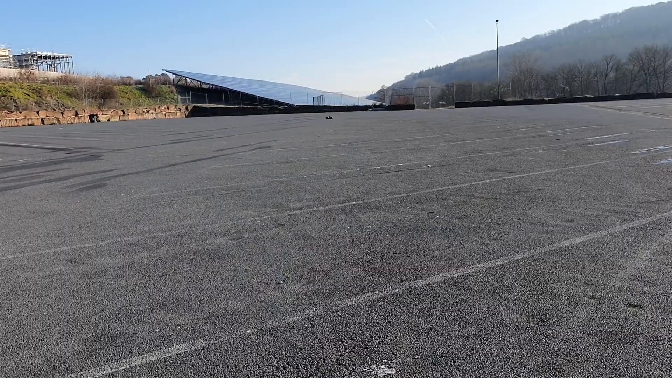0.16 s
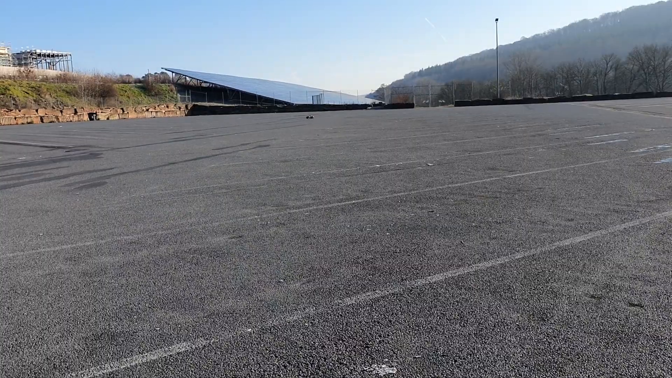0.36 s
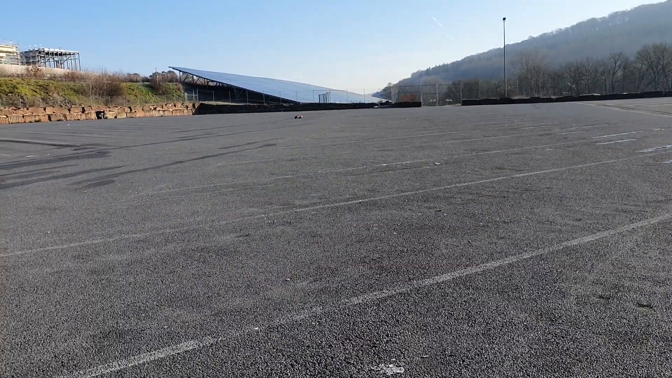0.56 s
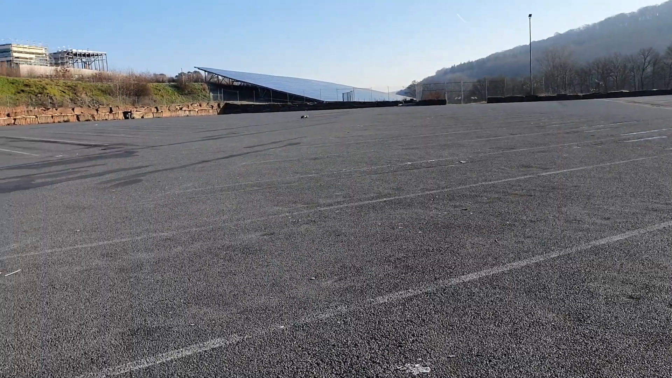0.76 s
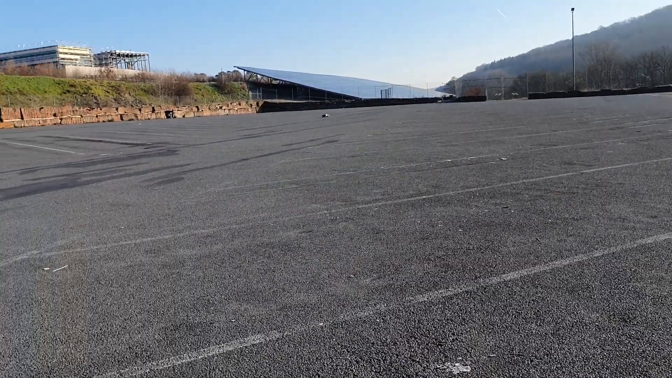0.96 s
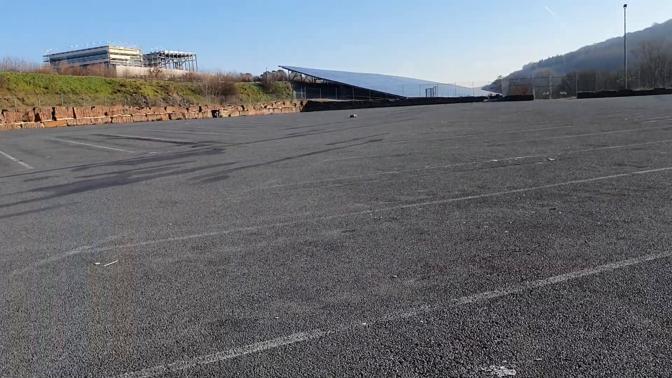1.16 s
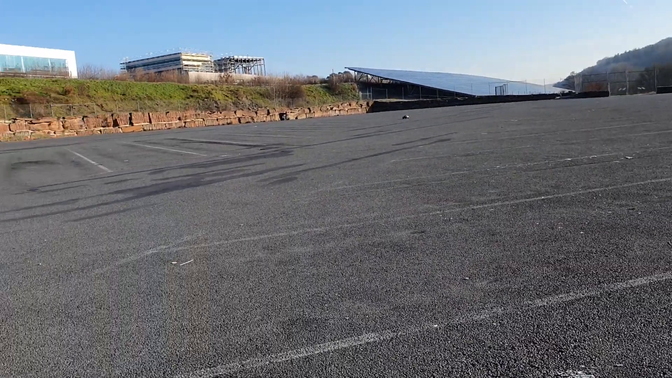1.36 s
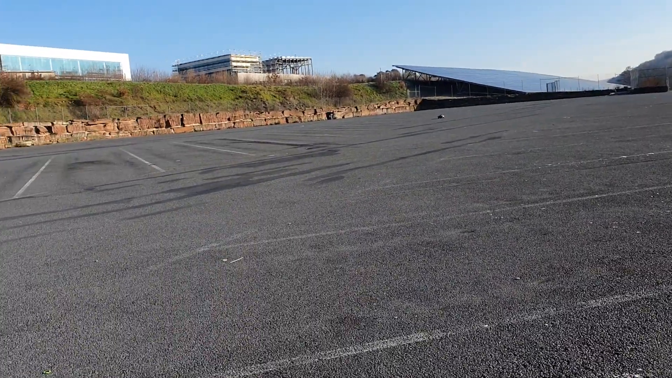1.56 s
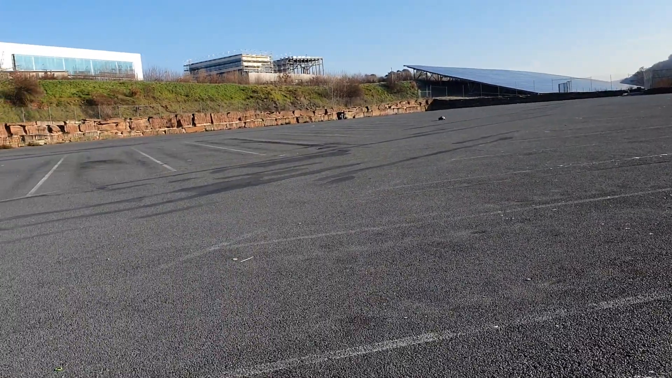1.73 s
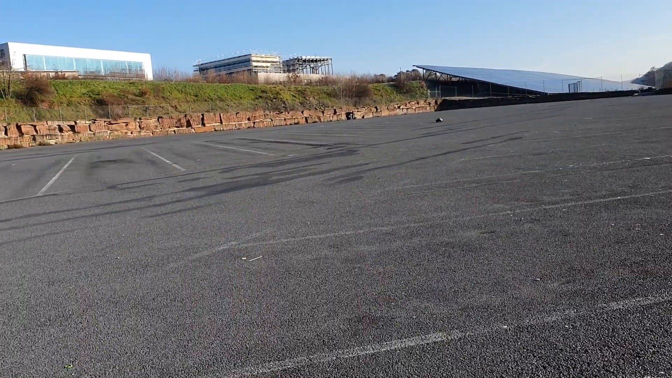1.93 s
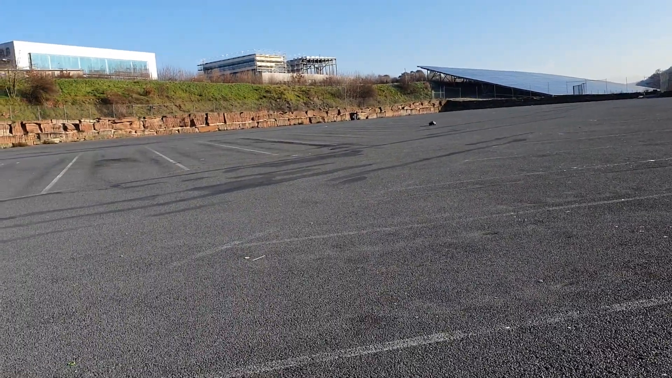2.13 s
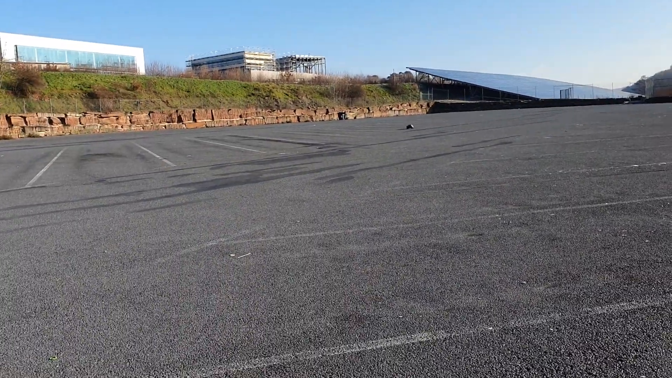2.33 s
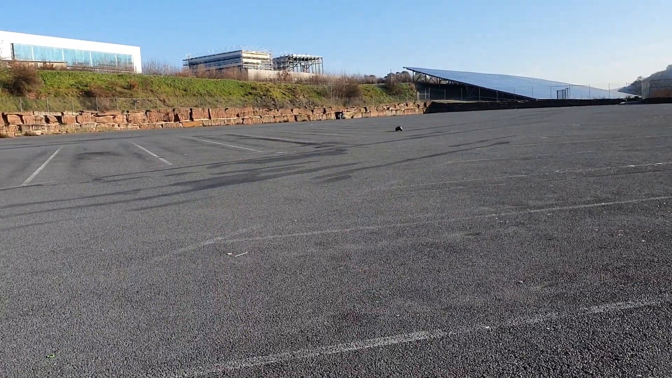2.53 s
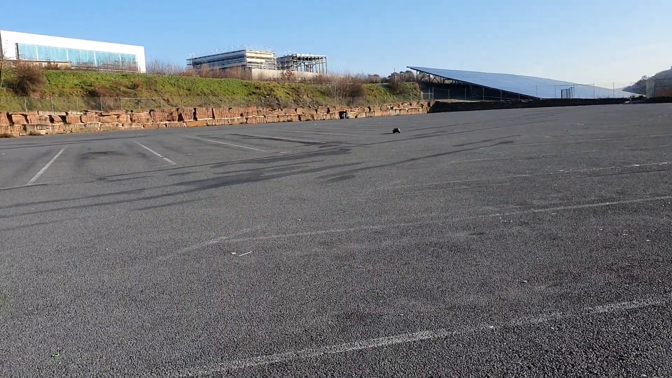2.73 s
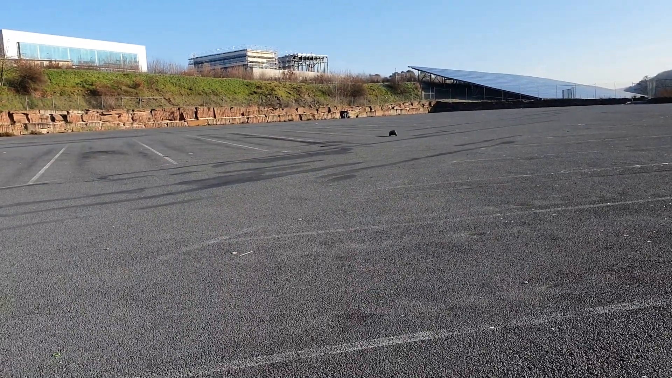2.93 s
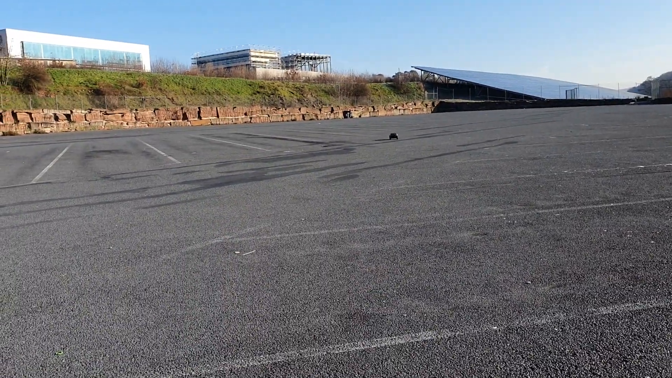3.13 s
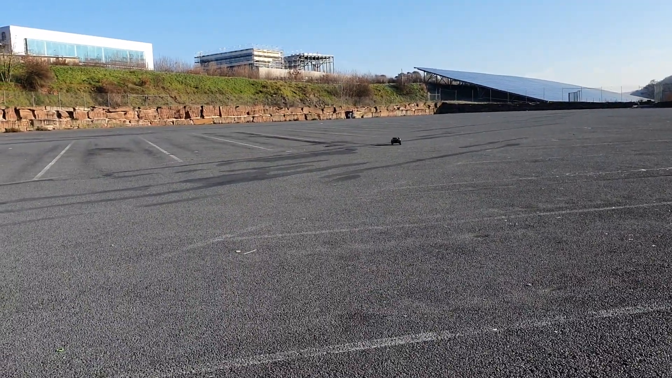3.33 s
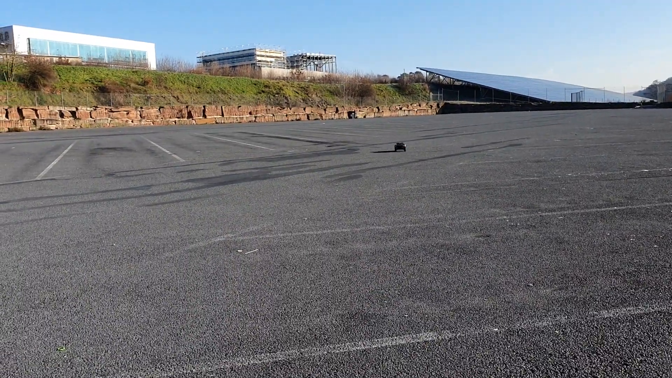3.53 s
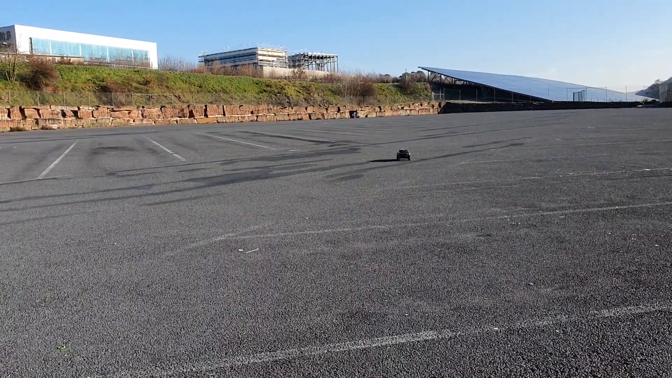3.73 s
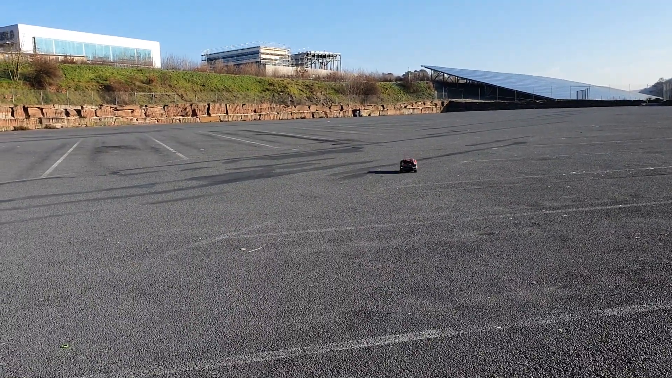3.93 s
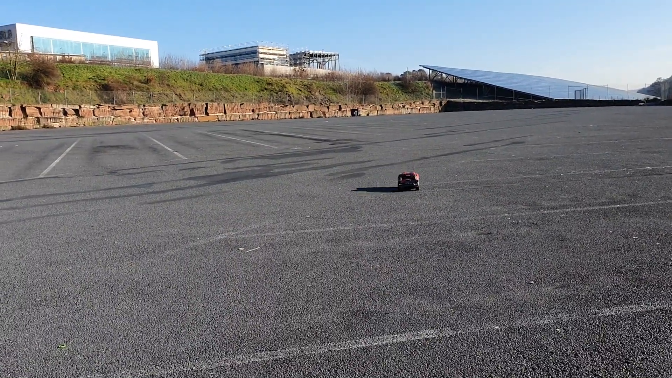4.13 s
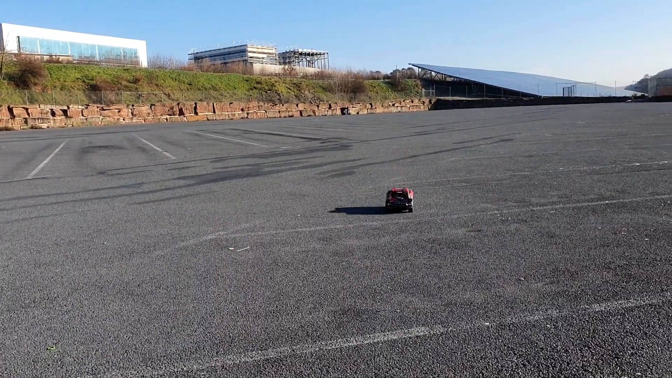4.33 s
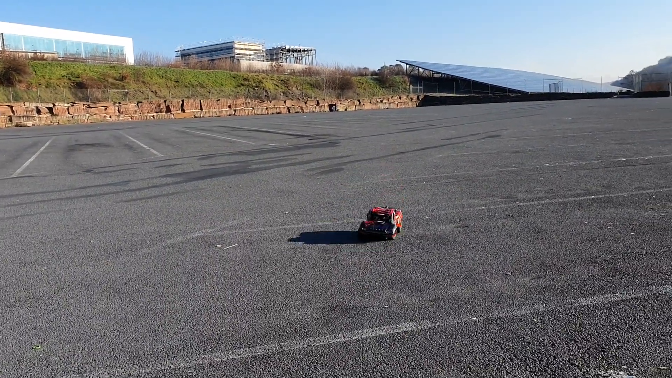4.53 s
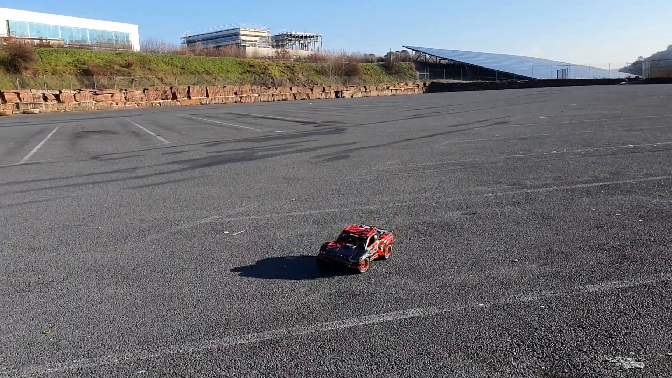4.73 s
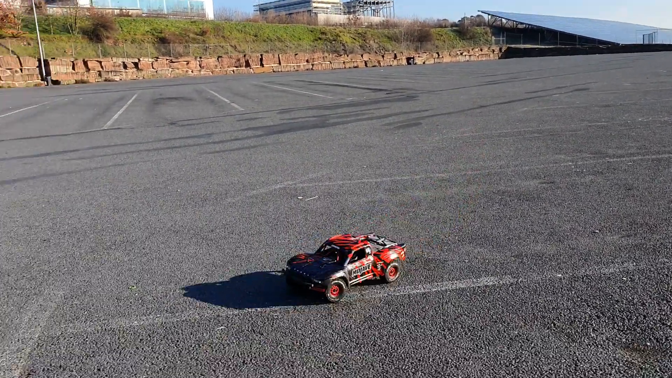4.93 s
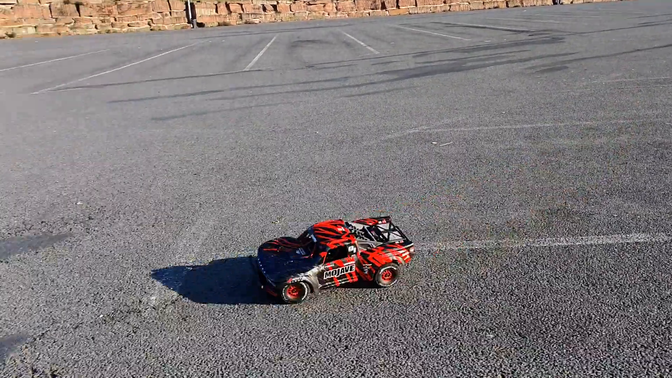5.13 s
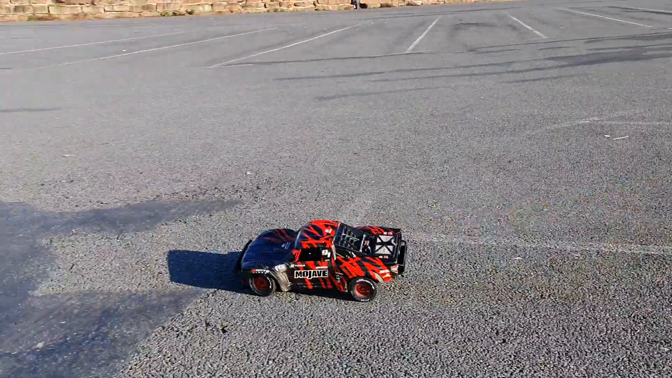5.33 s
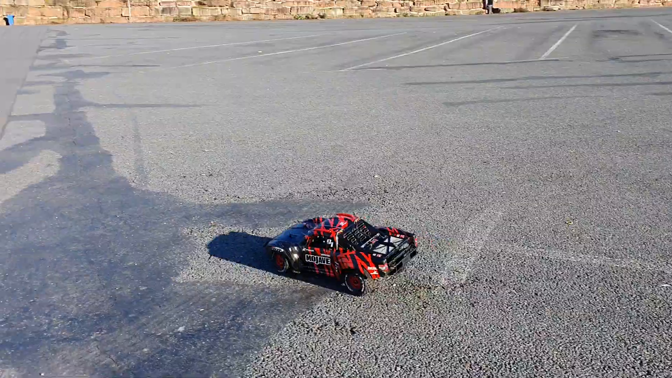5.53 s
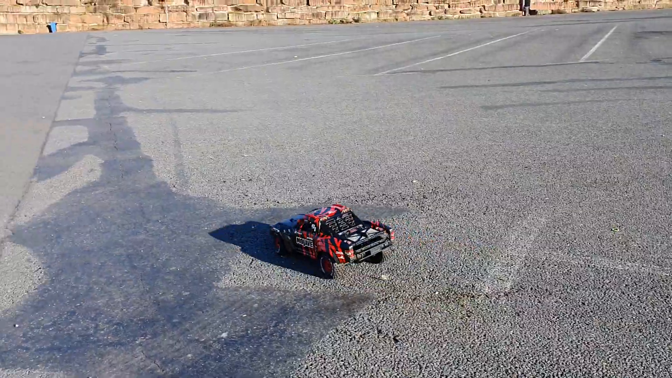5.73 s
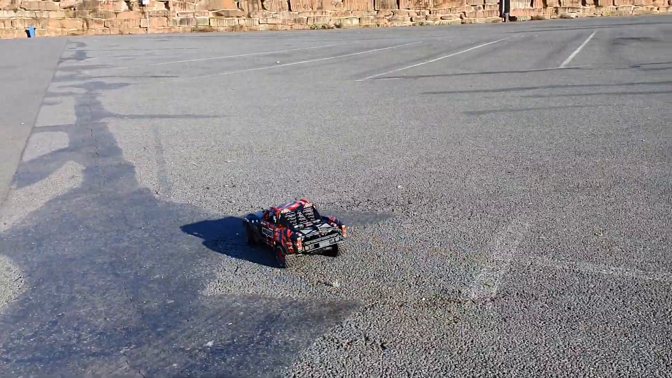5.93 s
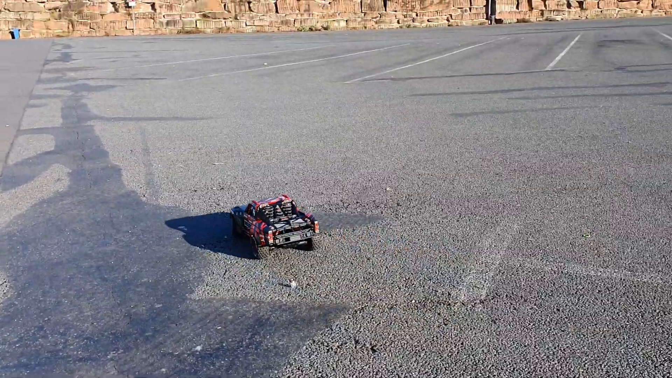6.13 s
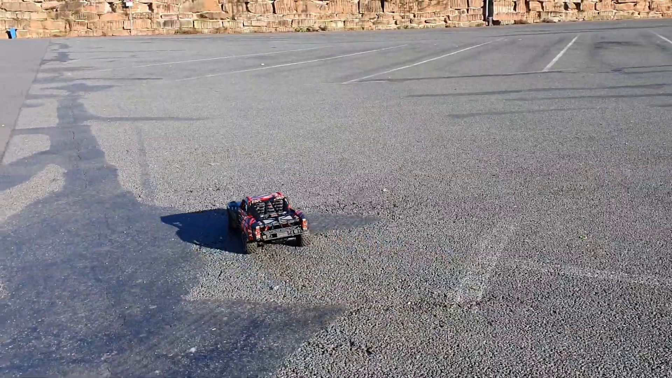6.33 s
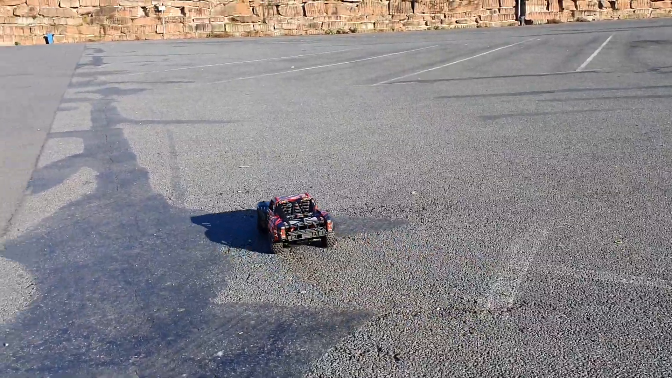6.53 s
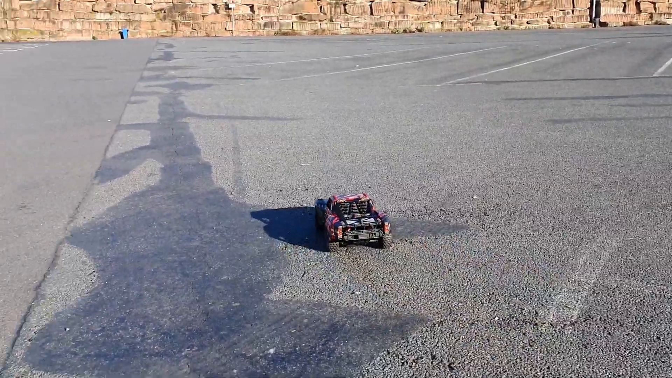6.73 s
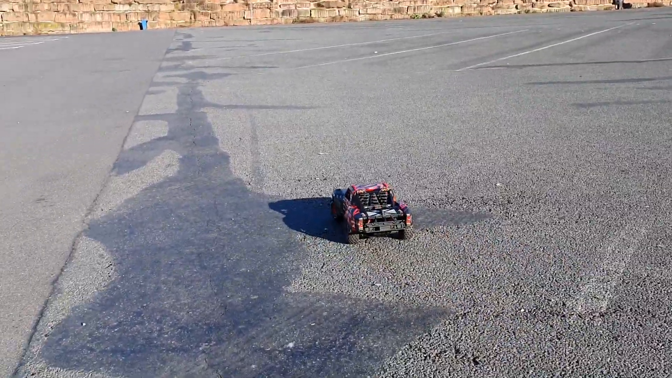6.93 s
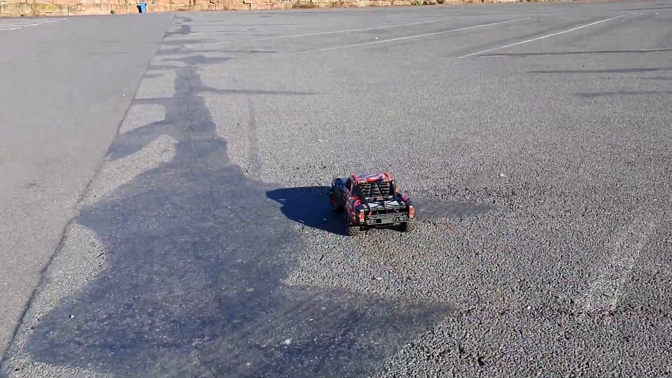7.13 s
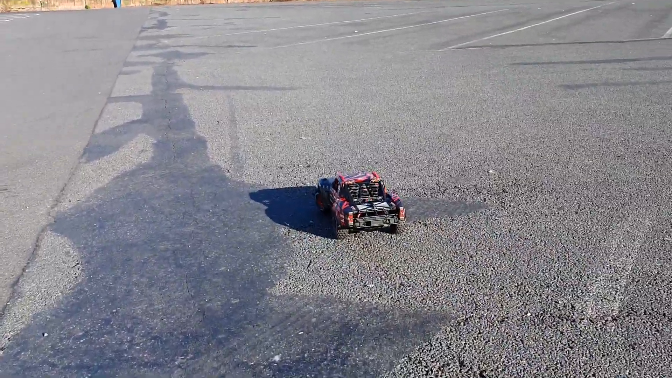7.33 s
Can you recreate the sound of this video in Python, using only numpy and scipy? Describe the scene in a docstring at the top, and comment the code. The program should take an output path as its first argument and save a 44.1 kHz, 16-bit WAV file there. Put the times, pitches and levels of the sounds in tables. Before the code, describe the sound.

A toy truck's gear whine rises from far across an empty car park, noisy and rattling, and swells as it nears the handheld stereo microphone. A sharp knock and short rubber chirps mark the turn, with hollow tyre drumming and a hard jolt. The motor then slides down in pitch, singing thinly as it creeps to rest, leaving tiny ticks and low open-air rumble.

```python
"""A small electric radio-controlled truck races up an empty asphalt car park, lifts off, brakes close by and rolls
to a stop. Its gear teeth whine in harmonics of the meshing rate and rattle as noise in the plastic body.
The tyres drum, roar, chirp and spray sand; jolts clatter, small bright ticks are scattered about, and chopped
current makes the motor sing at low throttle. A low outdoor rumble, far-off traffic and a few puffs of air
lie beneath, all heard through two microphone ports."""
import sys
import numpy as np
from scipy import signal
from scipy.fft import rfft, irfft, next_fast_len
from scipy.io import wavfile

SR = 44100
rng = np.random.default_rng(int(sys.argv[2]) if len(sys.argv) > 2 else 0)


def wrap_up_sound(samples):
    """Save the sound to the file named by the first command line argument, as 16-bit audio."""
    columns = np.atleast_2d(samples).T
    # keep every value between -1 and 1, then stretch to whole-number steps
    tamed = np.clip(columns, -1, 1)
    steps = np.round(tamed * 32767).astype(np.int16)
    wavfile.write(sys.argv[1], SR, steps)


N = 325017
TIME = np.arange(N) / SR  # s
PADDED = next_fast_len(N + 4096)
HZ = np.maximum(np.fft.rfftfreq(PADDED, 1 / SR), 1)
PINION_TEETH = 10
CRUISE_HZ, REFERENCE_M = 1900, 10  # tooth rate and distance at which the loudness laws start


def from_db(db):
    """Decibels to gain."""
    return 10 ** (np.asarray(db) / 20)


def rms_one(x):
    """Scale to unit power."""
    return x / np.sqrt(np.mean(x ** 2) + 1e-20)


def in_time(rows):
    """Each column of a curve at every sample."""
    s, *columns = np.transpose(rows)
    return [np.interp(TIME, s, column) for column in columns]


def at_hz(points):
    """A spectrum table at every frequency, interpolated over log frequency."""
    hz, value = np.transpose(points)
    return np.interp(np.log(HZ), np.log(hz), value)


def filtered(x, gain):
    """Apply a gain per frequency."""
    return irfft(rfft(x, PADDED) * gain, PADDED)[..., :N]


def coloured(x, spectrum):
    """Give a spectrum, falling steeply beyond its ends; rms 1."""
    low_skirt = 1 + (spectrum[0][0] / HZ) ** 10
    high_skirt = 1 + (HZ / spectrum[-1][0]) ** 20
    return rms_one(filtered(x, from_db(at_hz(spectrum)) / np.sqrt(low_skirt * high_skirt)))


def drift(rate_hz):
    """Random wandering with spread 1, mostly slower than the given rate."""
    return rms_one(filtered(rng.standard_normal(N), 1 / (1 + (HZ / rate_hz) ** 4)))


def white():
    """Two unrelated noises."""
    return rng.standard_normal((2, N))


def grains(per_s, spread_db):
    """Random clicks of uneven size, each with two strengths of its own."""
    born = rng.random(N) < per_s / SR
    size_db = spread_db * np.minimum(rng.exponential(1, N), 4)
    return rms_one(born * from_db(size_db) * white())


def held(start, end, attack_s, release_s):
    """Rise from start, hold until end, fall back: 0-1."""
    rise = (TIME - start) / attack_s
    fall = 1 - (TIME - end) / release_s
    return np.clip(np.minimum(rise, fall), 0, 1)


def struck(s, rise_s, decay_s):
    """A quick rise and an exponential decay: 0-1."""
    decay = np.exp(-np.clip((TIME - s - rise_s) / decay_s, 0, 20))
    return np.clip((TIME - s) / rise_s, 0, 1) * decay


def hump(s, half_width_s):
    """A smooth swell around a moment: 0-1."""
    return np.exp(-.5 * ((TIME - s) / half_width_s) ** 2)


def loudness(law, mesh_hz, distance_m):
    """Level in dB: louder with speed, fainter with distance."""
    db, per_speed_db, per_distance_db = law
    speed_db = per_speed_db * np.log10(mesh_hz / CRUISE_HZ)
    return db + speed_db - per_distance_db * np.log10(distance_m / REFERENCE_M)


def spread(pair, likeness):
    """Two unrelated signals become left and right, as alike as the table says."""
    alike = np.clip(at_hz(likeness), 0, .999)
    difference = filtered(pair[1], np.sqrt((1 - alike) / (1 + alike)))
    return pair[0] + difference * [[1], [-1]]


def motor_turn(mesh_hz, view, hunting=.004, backlash=0.01437):
    """Tooth phase: the speed hunts slightly, and the gears chatter in their backlash once the flank shows."""
    coasting = np.clip(view - 1, 0, 1)
    speed = 1 + hunting * drift(16.25) + backlash * coasting * drift(59.6)
    return 2 * np.pi * np.cumsum(mesh_hz * speed) / SR


def gear_tone(turn, multiple, uneven, blur_hz=30, sideband=0.29):
    """One order of the gears; uneven load blurs it, high orders most; the off-centre pinion adds sidebands."""
    width = blur_hz * max(multiple, 1) ** 1.4
    uneven = np.clip(uneven * np.sqrt(multiple), 0, 1)
    load = np.sqrt(1 - uneven) + np.sqrt(uneven / 2) * (drift(width) + 1j * drift(width))
    wobble = 1 + sideband * (1 + drift(13)) * np.cos(turn / PINION_TEETH + multiple)
    return rms_one(np.real(load * np.exp(1j * multiple * turn)) * wobble)


def whine(turn, view, level_db, uneven=.7):
    """Tooth harmonics of the pinion, radiated by the gearbox; their balance turns with the truck."""
    # Harmonics of the tooth rate against the drive level.
    # Each row: multiple, dB from afar, dB from the nose, dB from the flank.
    tooth_orders = [(1, -14, -14, -6), (2, -18, -13.5, -13), (3, -17.5, -14, -16), (4, -21, -17, -18),
                    (5, -19, -17.5, -28)]
    # One harmonic swells briefly. Each row: time in seconds, half width in seconds, multiple, gain in dB.
    swells = [(.44, .055, 2, 12), (1.08, 0.1, 2, 10), (4.731, 0.051, 1, 7), (4.912, .018, 1, 10.5),
              (5.53, 0.054, 3, 10), (5.77, 0.017, 1, 9.5), (5.92, .045, 2, 11.5), (6.12, 0.045, 1, 3)]
    # How well the gearbox radiates. Each row: frequency in Hz, gain in dB.
    gearbox = [(300, -11.5), (700, -4), (1200, 3), (1600, -3), (1780, 2), (2000, 1), (2400, 2), (3000, 1),
               (3700, 1.5), (4600, -5), (5400, -1), (5800, -14.5), (6300, -27), (7200, -44)]
    tones = 0
    for k, *by_view_db in tooth_orders:
        swell_db = sum(db * hump(s, width) for s, width, multiple, db in swells if multiple == k)
        facing_db = np.interp(view, np.arange(len(by_view_db)), by_view_db)
        tones = tones + from_db(level_db + facing_db + swell_db) * gear_tone(turn, k, uneven)
    return filtered(tones, from_db(at_hz(gearbox)))


def rattle(turn, view, level_db, tooth=0.3, shaft=0.18, shake_db=1.1, clatter=0.28,
           far_db=-1, nose_db=-3.5, flank_db=-1):
    """Teeth scrape and knock on every mesh and shaft turn; the body's colour changes as it nears and turns."""
    # The body from afar, from the nose and from the flank. Each row: frequency in Hz, relative level in dB.
    far_colour = [(880, -30), (1500, -9), (1650, -10.5), (1790, -7.5), (1970, -18), (2310, -7), (2710, 6),
                  (3530, -16.5), (3750, -22.5), (4100, -9), (4600, -28.5), (5340, -25), (5730, -46),
                  (6190, -25.5), (7000, -49), (9100, -84), (15400, -120)]
    nose_colour = [(880, -31), (1500, -12), (1640, -16.5), (1870, -7.5), (2160, -6.5), (2320, 2),
                   (2450, 2.5), (2790, -13), (3250, -8.5), (3980, -19), (4320, -17), (4650, -21),
                   (5540, -20), (6550, -45), (7500, -41), (9750, -77), (16500, -120)]
    flank_colour = [(820, -17), (1400, -3), (1530, -17), (1690, -6.5), (1980, 2.5), (2150, -0.5),
                    (2630, 3.5), (3540, -1.5), (3990, -2), (4460, -14), (4890, -9), (5430, -22),
                    (6290, -17.5), (7500, -48.5), (9750, -58), (16500, -120)]
    contact = (1 + tooth * np.cos(turn)) * (1 + shaft * np.cos(turn / PINION_TEETH))
    scrape = white() + clatter * grains(1500, spread_db=4.5)
    force = scrape * contact * from_db(shake_db * drift(66.1))
    out = 0
    views = [(far_colour, far_db), (nose_colour, nose_db), (flank_colour, flank_db)]
    for k, (spectrum, db) in enumerate(views):
        share = np.maximum(1 - np.abs(np.clip(view, 0, 2) - k), 0)
        out = out + from_db(level_db + db) * np.sqrt(share) * coloured(force, spectrum)
    return out


def shell_echoes(x, depth, nearest_ms, farthest_ms, sway=0.061, count=5):
    """Short reflections between asphalt, chassis and shell ripple the noise; their delays wander slowly."""
    out = x.copy()
    for ms in np.geomspace(nearest_ms, farthest_ms, count):
        delay = ms / 1000 * (1 + sway * drift(1.2))
        echo = np.array([np.interp(TIME - delay, TIME, side) for side in x])
        out += depth * rng.choice([-1, 1]) * echo
    return out / np.sqrt(1 + count * depth ** 2)


def tyre_levels(mesh_hz, distance_m, attack_s=0.087, release_s=0.67):
    """Drumming and tread roar in dB: rolling, plus scrubbing."""
    # Loudness laws. In order: dB at cruising speed and reference distance,
    # dB per tenfold speed, dB lost per tenfold distance.
    drum_law = (-43, 32, 9.4)
    tread_law = (-39, 30.9, 10)
    # The tyres scrub at the launch and through the braking turn.
    # Each row: start in seconds, end in seconds, more drumming in dB, more tread roar in dB.
    scrubs = [(-.3, 1.25, 8, 6), (3.79, 5.08, 13.5, 3.5)]
    drum_db = loudness(drum_law, mesh_hz, distance_m)
    tread_db = loudness(tread_law, mesh_hz, distance_m)
    for start, end, more_drum_db, more_tread_db in scrubs:
        scrub = held(start, end, attack_s, release_s)
        drum_db = drum_db + more_drum_db * scrub
        tread_db = tread_db + more_tread_db * scrub
    return drum_db, tread_db


def tyres(drum_db, tread_db, view, bounce_db=1.0, underbody_db=-7):
    """Coarse asphalt drums on the hollow tyres and roars in tread and underbody as the wheels bounce."""
    # Hollow tyres, tread, and the hollow under the chassis, heard only towards the flank.
    # Each row: frequency in Hz, relative level in dB.
    drum_colour = [(82, -44.5), (140, -18.5), (216, -6), (264, 6), (392, -3), (451, -10.5), (491, -13.5),
                   (600, -31.5), (780, -50.5), (1320, -120)]
    tread_colour = [(260, -37), (450, -5), (495, -4.5), (642, -6.5), (742, 2), (811, 0), (882, 3.5),
                    (959, 2.5), (1170, 5.5), (1530, -0.5), (1700, -9), (2210, -35.5), (3740, -120)]
    underbody_colour = [(540, -6), (640, 8), (780, 0.5), (850, -8)]
    road = (white() + grains(4000, spread_db=1.5)) * from_db(bounce_db * drift(25))
    underbody = from_db(underbody_db) * np.clip(view - 1, 0, 1) * coloured(road, underbody_colour)
    drumming = from_db(drum_db) * coloured(road, drum_colour)
    return drumming + from_db(tread_db) * (coloured(road, tread_colour) + underbody)


def axle(turn, drum_db, tread_db, layshaft_db=-11, lug_db=-9, uneven=.7):
    """The slower layshaft and the tread lugs hum as the tyres work."""
    # Orders of the layshaft and of the tread lugs.
    # Each row: multiple of the tooth rate, relative level in dB.
    layshaft_orders = [(.5, -2), (1.5, -4), (3.5, -39)]
    lug_orders = [(.118, -1), (.2, -3)]
    layshaft = sum(from_db(db) * gear_tone(turn, k, uneven) for k, db in layshaft_orders)
    lugs = sum(from_db(db) * gear_tone(turn, k, uneven) for k, db in lug_orders)
    return from_db(drum_db + layshaft_db) * layshaft + from_db(tread_db + lug_db) * lugs


def grit(drive_db, distance_m, sand_db=-20, air_db_per_m=0.71, hiss=1.9,
         spray_attack_s=.3, spray_release_s=0.56):
    """Sand crackles under the driven wheels, fading over distance, and sprays in the turn; small ticks join in."""
    # Sand and ticks, then the spray. Each row: frequency in Hz, relative level in dB.
    grit_colour = [(4120, -39.5), (7000, -4.5), (7570, -15.5), (8210, 0.5), (8640, 2), (9440, -3),
                   (12300, -11), (14000, -21), (15000, -4.5), (15800, -20.5)]
    spray_colour = [(6000, 4), (7500, -6), (9000, -1), (11500, -4), (14000, -6), (15800, -3)]
    # Small bright ticks, from handling, stones or loose parts.
    # Each row: time in seconds, level in dB, decay in seconds.
    tick_rows = [(.685, -67, 0.023), (.86, -72, 0.058), (4.585, -30, .007), (6.124, -56, .002),
                 (6.59, -63, 0.011), (6.7, -71, 0.045), (6.921, -71, 0.062)]
    # Sand sprays sideways in the turn. In order: start in seconds, end in seconds, level in dB.
    start, end, spray_db = (3.94, 5.28, -49.5)
    crackle = coloured(grains(680, spread_db=3.5) + hiss * white(), grit_colour)
    sand = from_db(drive_db + sand_db - air_db_per_m * distance_m) * crackle
    tick_level = sum(from_db(db) * struck(s, rise_s=0.0025, decay_s=decay) for s, db, decay in tick_rows)
    ticks = tick_level * coloured(grains(700, spread_db=1) + 0.73 * white(), grit_colour)
    burst = from_db(spray_db) * held(start, end, spray_attack_s, spray_release_s)
    spray = burst * coloured(grains(900, spread_db=5) + white(), spray_colour)
    return sand + ticks + spray


def outdoors(rumble_db=-32.0, easing_db_per_s=0.45, traffic_db=-50.5):
    """A broad low rumble that slowly eases, far-off traffic, and a few puffs of air on the ports."""
    # Rumble and far-off traffic. Each row: frequency in Hz, relative level in dB.
    rumble_colour = [(20, -27), (32, -22), (50, -3.5), (70, -0.5), (90, -1.5), (125, -8.5), (180, -12),
                     (260, -20.5), (400, -41.5), (600, -47.5), (1100, -53), (2000, -40), (4000, -63.5),
                     (8000, -82), (15000, -72)]
    traffic_colour = [(150, -7.5), (280, 1), (450, -6), (700, -14), (1100, -9.5), (1600, -15.5),
                      (3000, -32.5), (5000, -42)]
    # Puffs of air on the microphone. Each row: time in seconds, level in dB, half width in seconds.
    puff_rows = [(5.75, -35, .025), (5.82, -35, .015), (5.96, -25.5, .02)]
    # How alike the open air is at the two ports. Each row: frequency in Hz, likeness 0-1.
    air_likeness = [(60, .82), (130, .96), (300, .98), (700, .8), (2000, .6), (8000, .3)]
    rumble = from_db(rumble_db - easing_db_per_s * TIME) * coloured(white(), rumble_colour)
    traffic = from_db(traffic_db) * coloured(white(), traffic_colour)
    puffs = sum(from_db(db) * hump(s, width) for s, db, width in puff_rows)
    air = puffs * coloured(white(), [(30, -28), (58, 10), (90, 5), (200, -58)])
    return spread(rumble + traffic + air, air_likeness)


def skid(jitter=0.029, rise_s=0.0044):
    """Rubber sticks and slips at an unsteady rate that glides as the grip changes."""
    # The tyres chirp as the brake bites. Each row: time in seconds, starting pitch in Hz,
    # fall in octaves per second, level in dB ahead of the partials, decay in seconds.
    chirps = [(3.796, 3520, 6, -24, .01), (3.823, 3260, 5, -25.5, 0.024), (4.276, 2505, 0, -23, 0.028)]
    # Partials of a chirp. Each row: multiple of the pitch, relative level in dB.
    skid_partials = [(1, 4), (1.401, -7.5)]
    out = 0
    unsteady = 1 + jitter * drift(294.7)
    for s, hz, fall, db, decay in chirps:
        glide = 2 ** (-fall * np.clip(TIME - s, 0, .5))
        slip = 2 * np.pi * np.cumsum(hz * unsteady * glide) / SR
        squeal = sum(from_db(part_db) * np.sin(k * slip) for k, part_db in skid_partials)
        out = out + from_db(db) * struck(s, rise_s, decay) * squeal
    return out * (1 + .4 * drift(207))


def jolts(ring_width_hz=550, rise_s=.002):
    """Each jolt is a short clatter of loose plastic with one ringing band."""
    # Jolts of the chassis.
    # Each row: time in seconds, level in dB, decay in seconds, ring in Hz, ring share of the power 0-1.
    jolt_rows = [(3.7995, -18.5, 0.0089, 3370, .2), (3.82, -23, 0.027, 3253, 0.3),
                 (3.929, -25, .014, 2400, 0.4), (4.584, -13, 0.009, 2420, 0.05),
                 (5.151, -26, .008, 3026, 0.8), (5.562, -26, 0.0044, 2700, 0.4),
                 (6.59, -43.5, 0.0059, 2450, 0.7), (6.667, -47, .009, 2460, .7),
                 (6.702, -42.5, 0.004, 2530, .75), (6.721, -49, .01, 2500, .75),
                 (6.7434, -47.5, .007, 2500, .75)]
    # Loose plastic. Each row: frequency in Hz, relative level in dB.
    jolt_colour = [(290, -35.5), (500, -14.5), (1350, 10.5), (1830, 1.5), (2340, 9.5), (3040, 14.5),
                   (3720, -28), (4240, 6), (7120, -57), (8470, -24), (15800, -41)]
    clatter = coloured(white(), jolt_colour)
    out = np.zeros((2, N))
    for s, level_db, decay, hz, share in jolt_rows:
        first = int(s * SR)
        span = slice(first, first + SR // 4)
        loose = clatter[:, span]
        band = signal.tf2sos(*signal.iirpeak(hz, hz / ring_width_hz, SR))
        # the band is applied twice for a narrower ring
        ring = rms_one(signal.sosfilt(np.vstack([band, band]), rng.standard_normal(loose.shape)))
        knock = np.sqrt(share) * ring + np.sqrt(1 - share) * loose
        out[:, span] += from_db(level_db) * struck(s, rise_s, decay)[span] * knock
    return out


def controller(chopper_hz=1010, waver_db=3.5, waver_hz=45, attack_s=.015, release_s=.035,
               creep_from_s=6.15, creep_to_s=6.5, creep_db=-61):
    """Chopped current makes the windings sing at a fixed pitch; a creep's narrow pulses leave a third partial."""
    # The throttle is barely pressed. Each row: start in seconds, end in seconds, level in dB.
    low_throttle = [(5.05, 5.87, -45.5), (5.88, 5.961, -38), (6.0, 6.21, -45.5), (6.251, 6.363, -49),
                    (6.37, 6.5, -60)]
    # Partials of the chopped current. Each row: multiple of the chopping rate, relative level in dB.
    chopper_partials = [(1, 3), (2, -14), (3, -11), (4, -22), (15, -41)]
    pressed = sum(from_db(db) * held(start, end, attack_s, release_s) for start, end, db in low_throttle)
    cycle = 2 * np.pi * chopper_hz * TIME
    tone = sum(from_db(db + waver_db * drift(waver_hz)) * np.sin(k * cycle) for k, db in chopper_partials)
    creep = held(creep_from_s, creep_to_s, attack_s, release_s) * np.sin(3 * cycle)
    return pressed * rms_one(tone) + from_db(creep_db) * creep


def at_ports(truck, view, pan_db, lead_ms):
    """The housing shades the two microphone ports differently, and the nearer one hears the truck first."""
    # Shading of sound from ahead and from close by.
    # Each row: frequency in Hz, left-right difference in dB.
    shade_ahead = [(300, 1), (750, 4), (1300, -6.5), (1900, -8.5), (2400, -12), (2850, -16.5), (3300, -10),
                   (3700, 2), (4300, -7), (4800, -2.5), (5500, -11), (7000, -0.5), (8500, 11.5),
                   (11000, 3.5), (15500, -1.5)]
    shade_close = [(300, -2.5), (750, -0.5), (1300, -1.5), (2100, -8.5), (2600, -10), (3300, -23.5),
                   (3800, -10.5), (4400, -6), (5700, -11.5), (7500, -4.5), (8600, 14.5), (10500, -1.5),
                   (15500, 1)]
    sides = np.array([[.5], [-.5]])
    close = np.clip(view - 1, 0, 1)
    shades = [from_db(sides * at_hz(table)) for table in (shade_ahead, shade_close)]
    ahead, beside = [filtered(truck, shade / shade.mean(axis=0)) for shade in shades]
    left, right = ((1 - close) * ahead + close * beside) * from_db(sides * pan_db)
    return np.array([np.interp(TIME + lead_ms / 1000, TIME, left), right])


def scene(bump_to_gears=0.23, bump_to_tread=0.18):
    """The truck on its path, over the outdoor rumble: speed, load, distance and bumps set its rolling levels."""
    # Motor speed. Each row: time in seconds, tooth rate in Hz.
    speed_rows = [(.25, 990), (.42, 1200), (.7, 1020), (1.05, 1200), (1.62, 1755), (2.4, 1755),
                  (3.76, 1922), (3.87, 2190), (4.5, 2050), (4.79, 2080), (4.86, 1830), (4.91, 2090),
                  (4.965, 1645), (5.35, 1185), (5.53, 1190), (5.77, 837), (6.1, 464), (6.55, 115),
                  (6.7, 20)]
    # Load on the gears through two blips, full throttle, lift, brake and creep.
    # Each row: time in seconds, level change in dB.
    load_rows = [(.16, 7.5), (.22, 2.5), (.41, 6), (.55, 2.5), (1.05, 6.5), (1.35, 2), (1.65, -0.5),
                 (3.7, 1), (3.76, -8.5), (3.85, -0.5), (4.1, -8.5), (4.55, -11.5), (4.68, -17), (5.02, -18),
                 (5.27, -14), (5.55, -12.5), (5.78, -6.5), (6.5, -7)]
    # The path. Each row: time in seconds, distance in metres, view (0 far, 1 nose, 2 flank),
    # left-right difference in dB, lead of the left side in ms.
    path = [(0, 35, 0.97, 2.7, -0.043), (.6, 45.4, 0.9, 1.2, -0.064), (1.1, 54.3, 0.49, 2, -0.044),
            (1.9, 27, 0.18, 1, -0.092), (2.8, 19.4, 0.93, 1.6, -0.029), (3.6, 12.86, 1, 0.3, -0.023),
            (4.3, 5.46, 1.144, 0, 0.042), (4.8, 2.85, 1.86, 1.3, 0.064), (5.3, 1.27, 2.2, 1.5, 0.073),
            (5.75, 1.86, 2.07, 2, 0.047), (6.3, 3, 1.93, -1.9, .12), (7.37, 3.9, 1.2, 6, 0.12)]
    # Bumps press the tyres down (+) or let them hop (-). Each row: time in seconds, drumming change in dB.
    bumps = [(4.19, 5.5), (4.29, 4), (4.37, 1.5), (4.63, -9.5), (4.68, 4), (4.72, 3), (4.765, 4.5),
             (4.825, 7), (4.87, 4), (4.945, -6), (5.02, 7.5), (5.13, 5.5), (5.21, 7.5)]
    # Gear loudness. In order: dB at cruising speed and reference distance,
    # dB per tenfold speed, dB lost per tenfold distance.
    gear_law = (-24.5, 41.5, 21.85)
    # How alike the truck's noises are at the two ports. Each row: frequency in Hz, likeness 0-1.
    truck_likeness = [(60, .99), (250, .998), (600, .98), (1200, .955), (2400, .95), (4000, .85),
                      (7000, .6), (12000, .4)]
    mesh_hz, = in_time(speed_rows)
    load_db, = in_time(load_rows)
    distance_m, view, pan_db, lead_ms = in_time(path)
    bump_db = sum(db * hump(s, half_width_s=0.014) for s, db in bumps)
    drive_db = loudness(gear_law, mesh_hz, distance_m) + load_db + bump_to_gears * bump_db
    drum_db, tread_db = tyre_levels(mesh_hz, distance_m)
    turn = motor_turn(mesh_hz, view)
    body = shell_echoes(rattle(turn, view, drive_db), depth=0.18, nearest_ms=2.019, farthest_ms=9)
    road = tyres(drum_db + bump_db, tread_db + bump_to_tread * bump_db, view)
    noises = spread(body + road + grit(drive_db, distance_m) + jolts(), truck_likeness)
    tones = whine(turn, view, drive_db) + axle(turn, drum_db, tread_db) + controller() + skid()
    return at_ports(noises + tones, view, pan_db, lead_ms) + outdoors()


def record(dry, cutoff_hz=15850):
    """The top is cut steeply, without phase shift."""
    return signal.sosfiltfilt(signal.ellip(10, .05, 60, cutoff_hz, fs=SR, output="sos"), dry)


dry = scene()
out = record(dry)
wrap_up_sound(out)
```